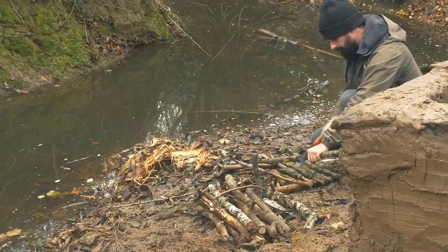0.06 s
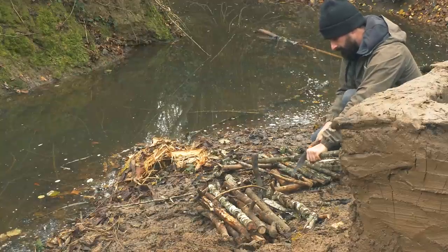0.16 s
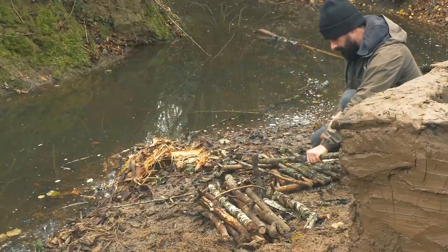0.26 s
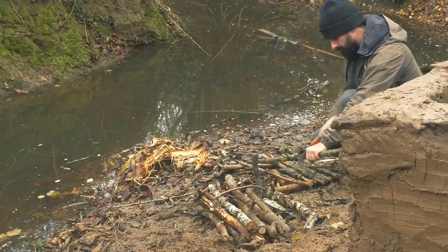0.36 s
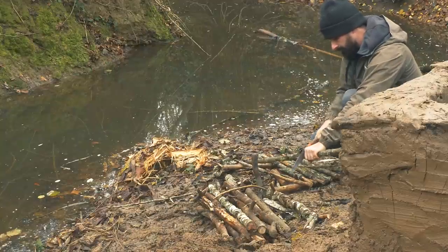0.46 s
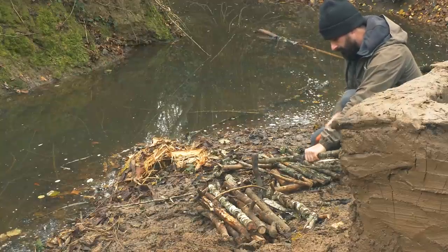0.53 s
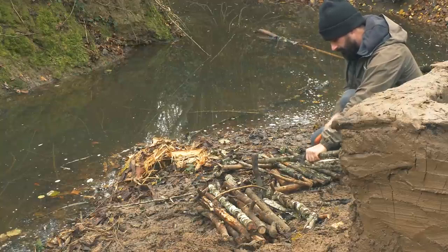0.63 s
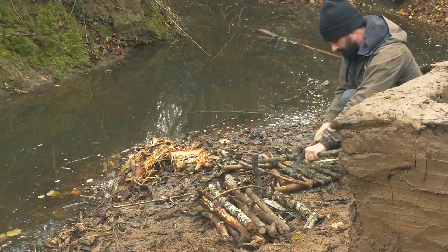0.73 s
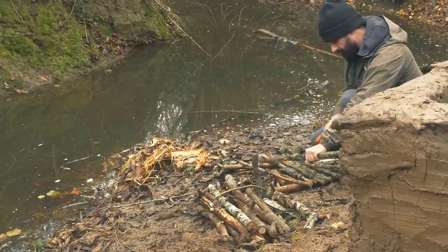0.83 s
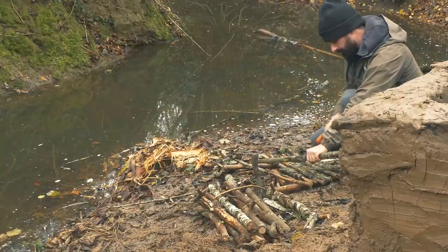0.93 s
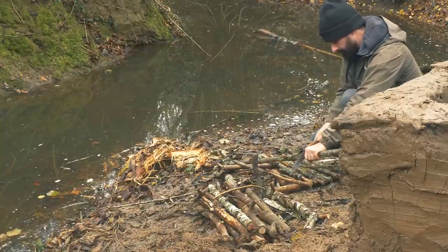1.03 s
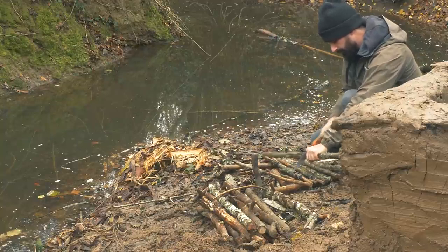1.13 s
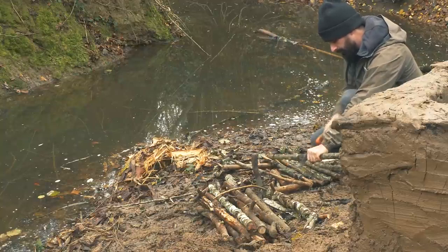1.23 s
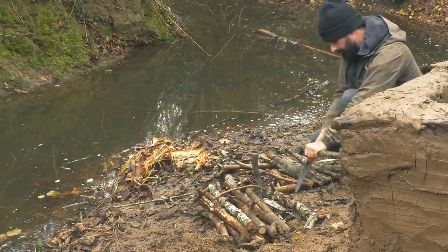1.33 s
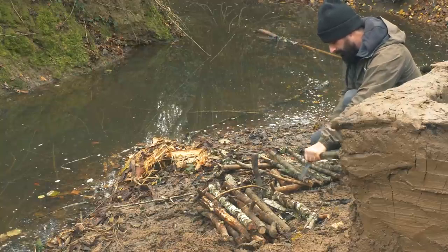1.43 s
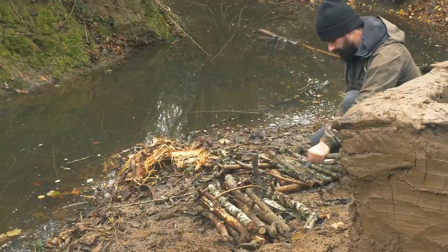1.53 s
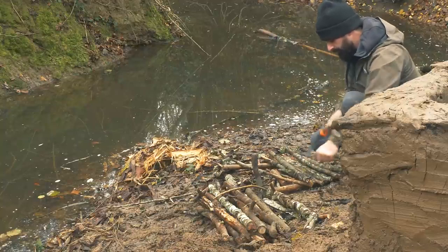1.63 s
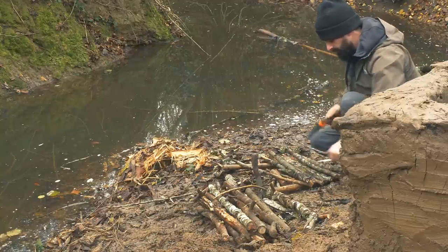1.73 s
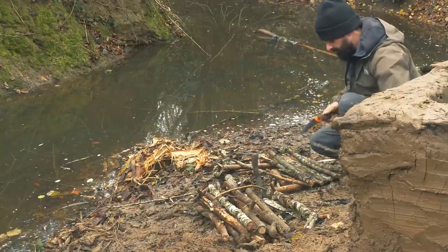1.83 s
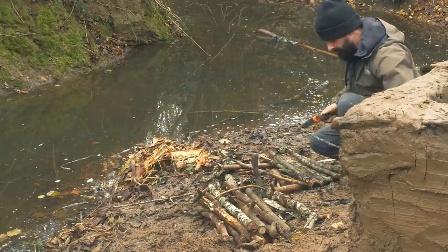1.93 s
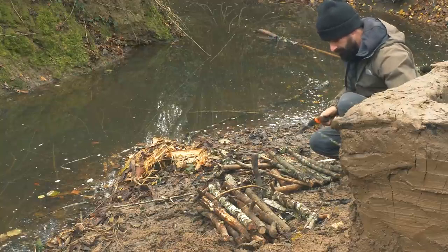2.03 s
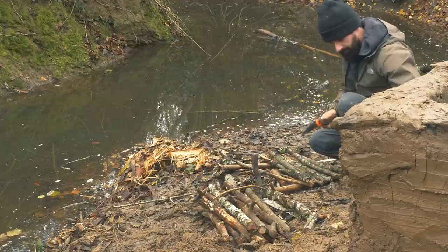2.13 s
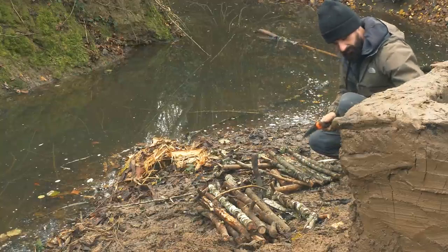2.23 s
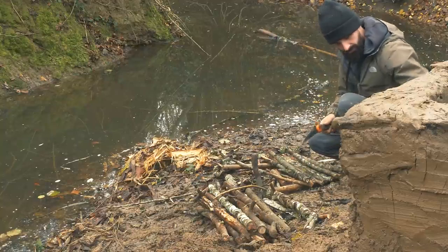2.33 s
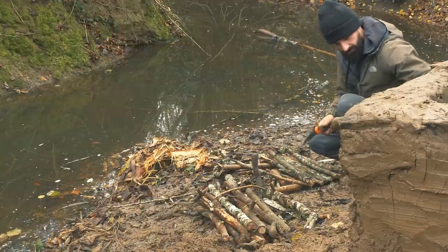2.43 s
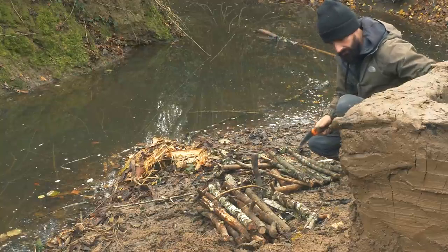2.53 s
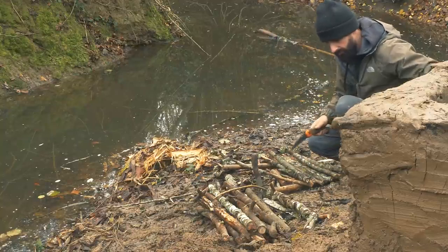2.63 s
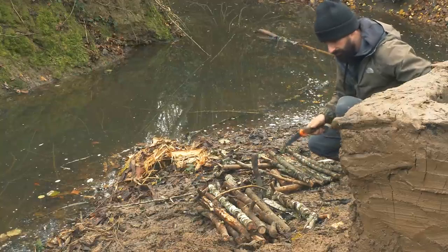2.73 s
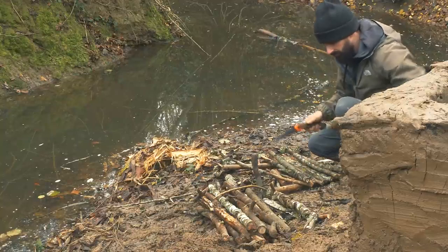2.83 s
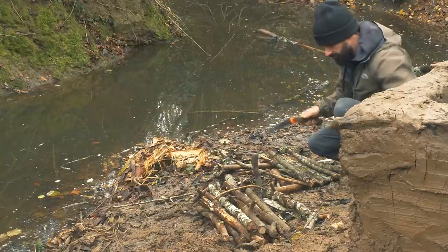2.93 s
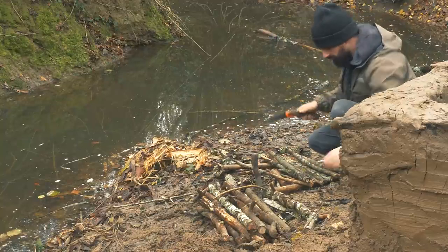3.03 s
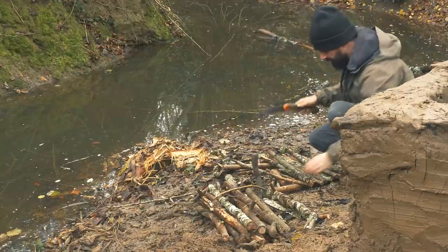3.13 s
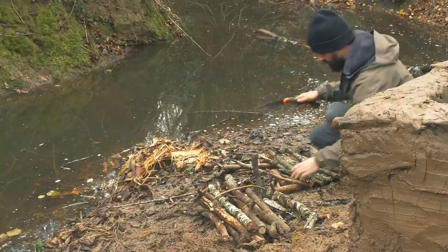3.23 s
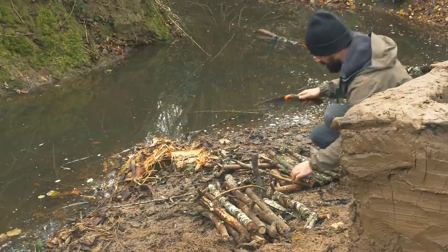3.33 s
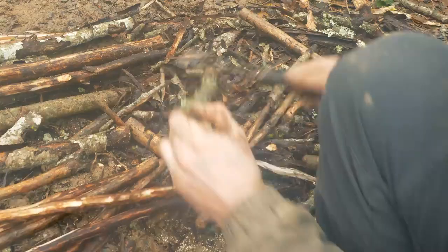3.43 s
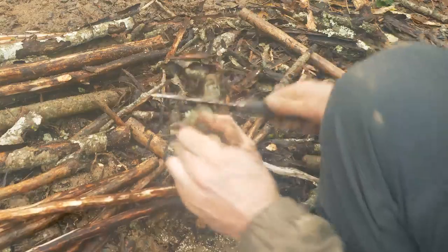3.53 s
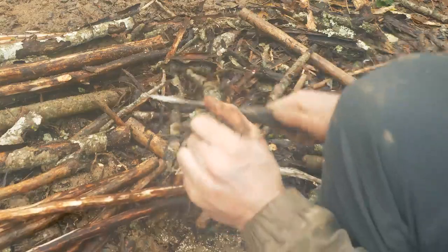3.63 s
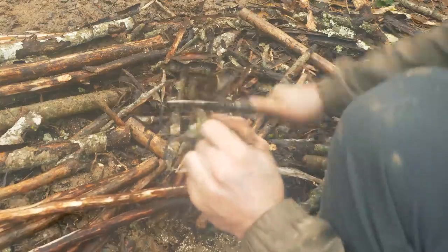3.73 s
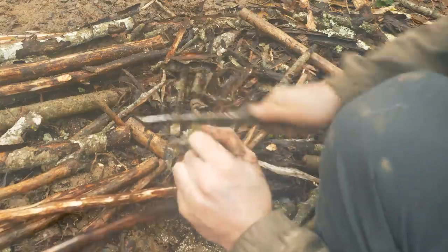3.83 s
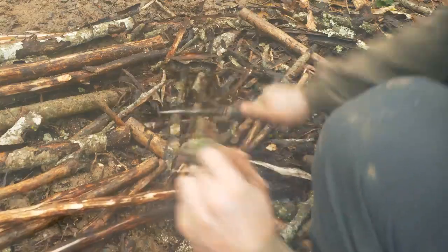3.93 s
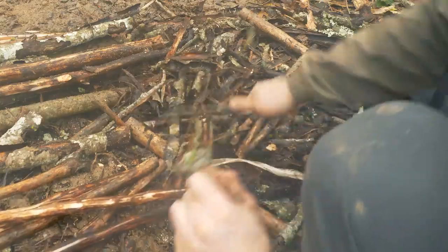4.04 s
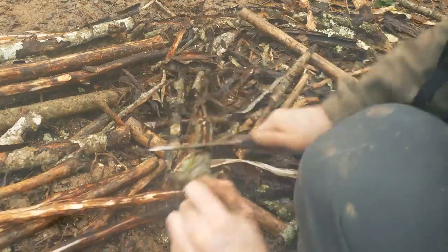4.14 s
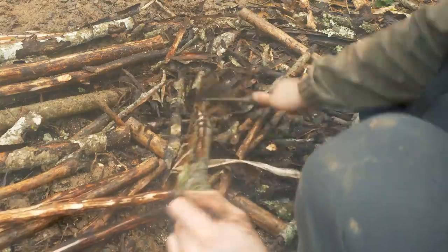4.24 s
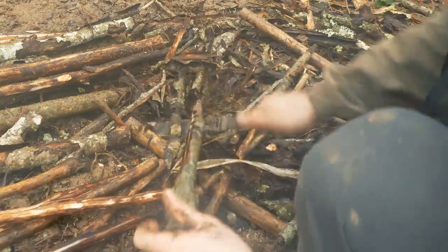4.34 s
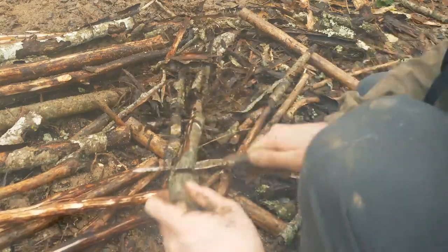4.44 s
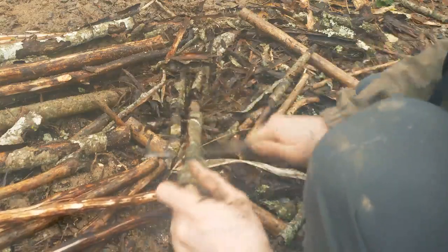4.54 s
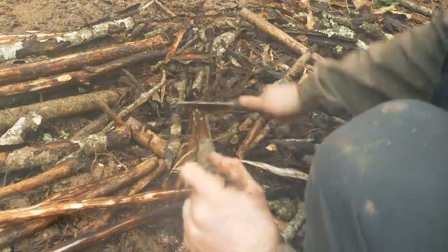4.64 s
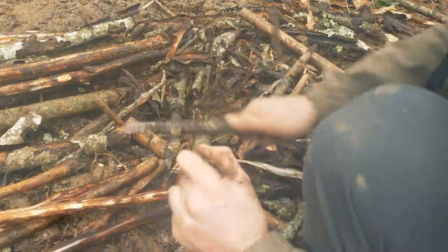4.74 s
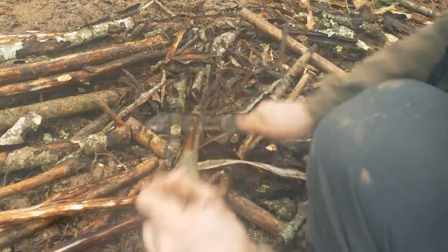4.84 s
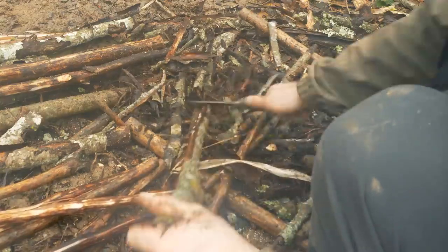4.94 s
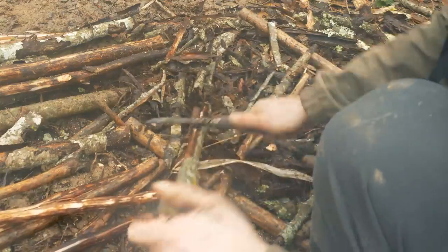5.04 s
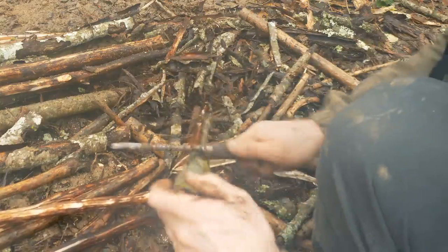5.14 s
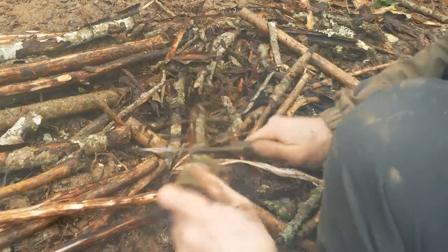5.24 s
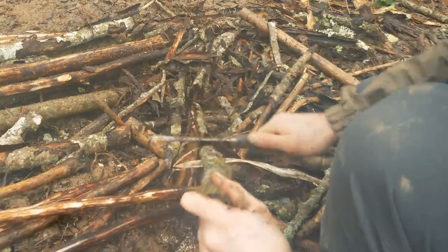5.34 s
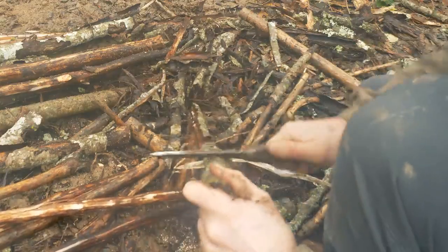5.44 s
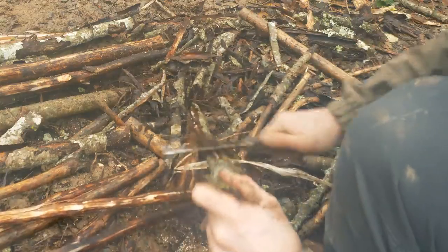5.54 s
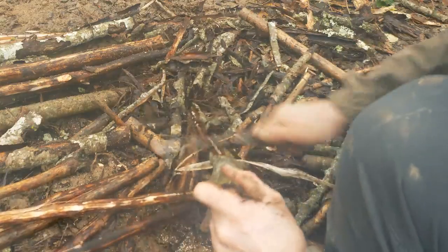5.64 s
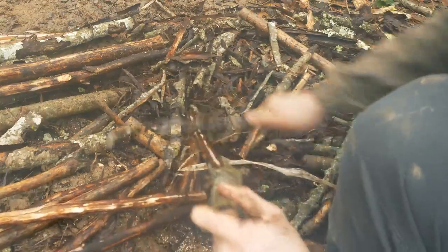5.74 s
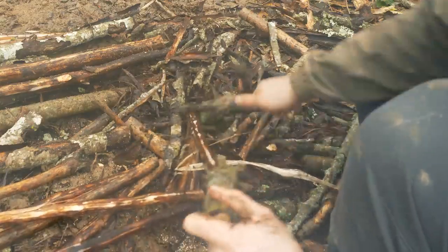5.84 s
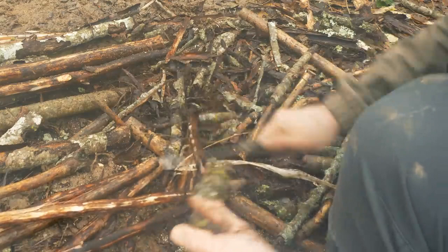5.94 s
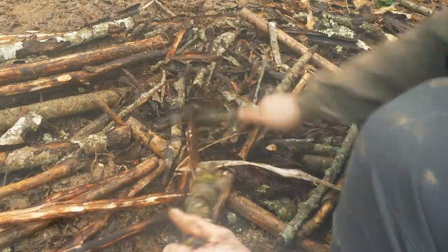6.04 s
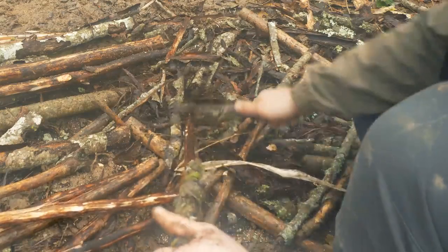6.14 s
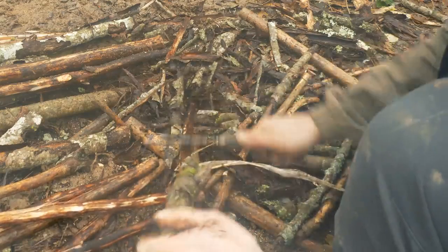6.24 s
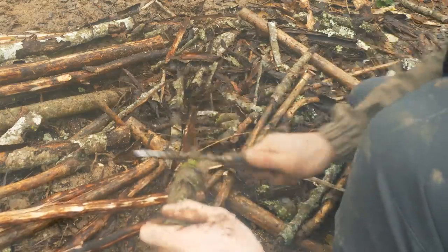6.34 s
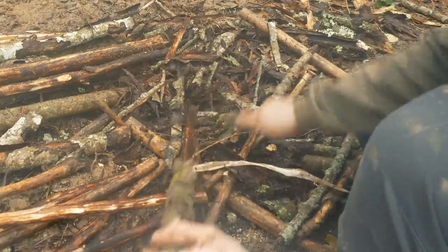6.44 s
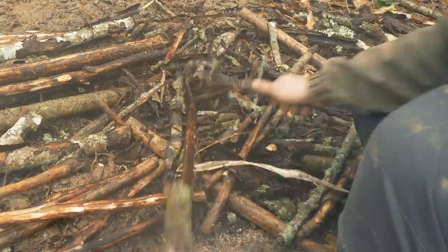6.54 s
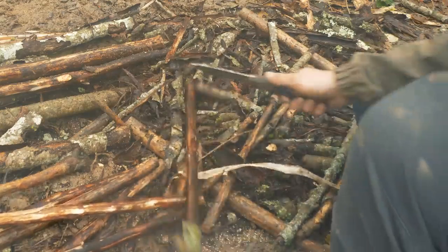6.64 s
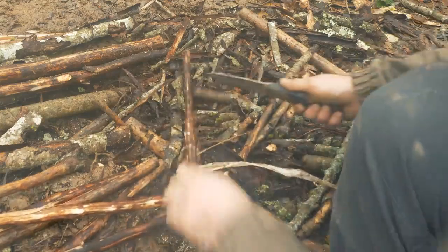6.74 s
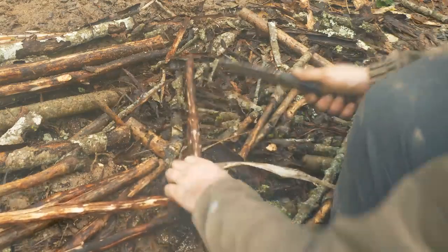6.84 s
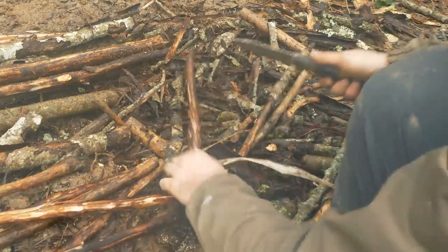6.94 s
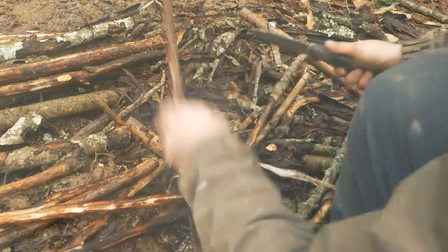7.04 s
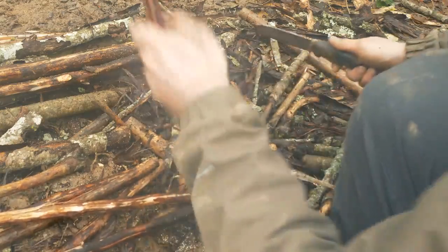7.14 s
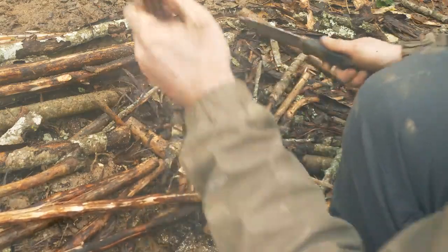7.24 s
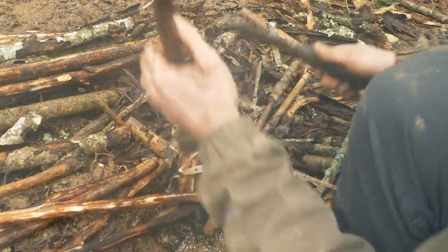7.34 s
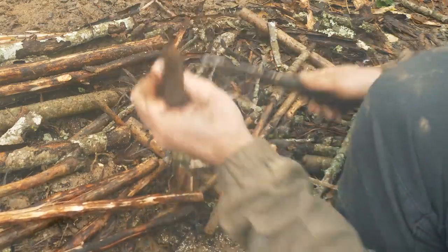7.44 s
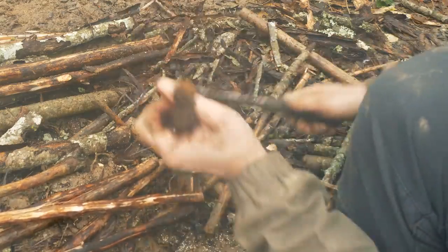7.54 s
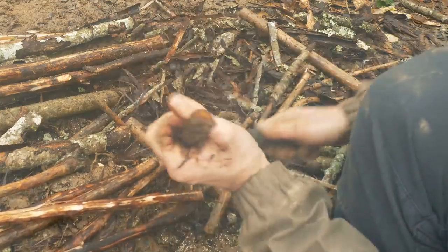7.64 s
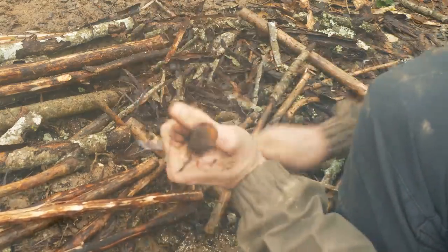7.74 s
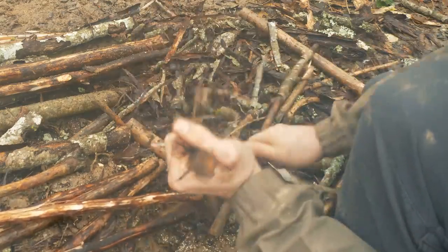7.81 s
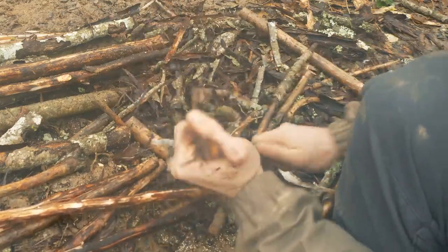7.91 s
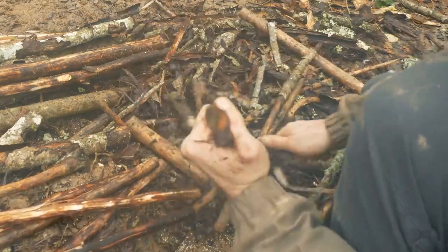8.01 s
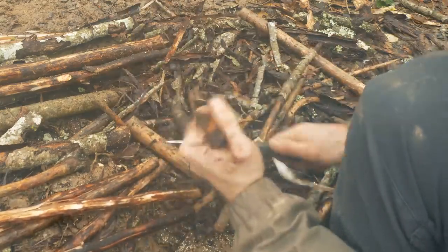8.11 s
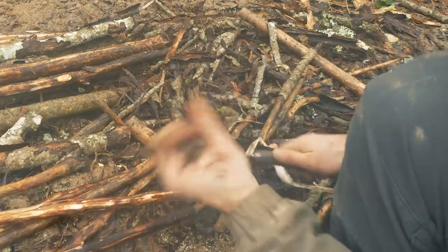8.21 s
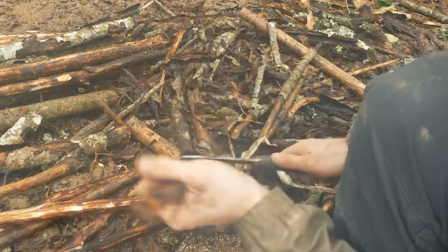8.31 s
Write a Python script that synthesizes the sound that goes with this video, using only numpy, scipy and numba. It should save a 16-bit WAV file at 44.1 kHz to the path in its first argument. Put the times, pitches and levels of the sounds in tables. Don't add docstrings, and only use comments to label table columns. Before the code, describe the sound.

Quiet, soft saw strokes and a thin high sizzle, broken by two startling fire pops and a cluster of twig snaps. Knees and sticks bump softly on wet ground. After an abrupt change, close bright scraping begins: short blade strokes tear fibrous bark, catching and snapping on knots, twigs rustling between. A lull of small wooden knocks leads to final crisp cuts. Near-mono outdoor sound, close and dry, with faint wind and water.

```python
import sys
import numpy as np
from scipy import signal
from scipy.fft import rfft, irfft, next_fast_len
from scipy.io import wavfile
from scipy.ndimage import uniform_filter1d
from numba import njit

SR = 44100
rng = np.random.default_rng(int(sys.argv[2]) if len(sys.argv) > 2 else 0)


def pcm_store(signal):
    levels = np.round(np.clip(np.atleast_2d(signal), -1, 1) * 32767)
    wavfile.write(sys.argv[1], SR, levels.astype(np.int16).T)


def boost(x):
    u = np.asarray(x, float) / 20
    return 10 ** u


N = 369116

# (time [s], length [s], level [dB], share of stroke at peak pressure [0-1], edge brightness [dB])
CUTS = [(3.789, 0.035, -27.5, 0.28, 2), (3.811, 0.042, -25, 0.6, 1), (4.006, 0.091, -24.5, 0.66, 0),
        (4.2, 0.065, -39, 0.43, 2.5), (4.285, 0.074, -25.5, 0.5, -1.5), (4.651, 0.088, -28.5, 0.6, 6),
        (4.912, 0.052, -32.5, 0.47, -3), (4.95, 0.062, -28.5, 0.39, 1), (5.205, 0.057, -39, 0.91, 4),
        (5.402, 0.034, -32.5, 0.58, 3.5), (5.607, 0.088, -34.5, 0.076, 6), (5.827, 0.087, -31.5, 0.27, 2.5),
        (6.111, 0.081, -31, 0.72, -2), (6.25, 0.057, -44, 0.5, 4.5), (6.509, 0.075, -31, 0.58, -4),
        (7.511, 0.019, -37, 0.86, 2), (7.857, 0.023, -28.5, 0.7, 4.5), (8.063, 0.0063, -20.5, 0.3, -5),
        (8.081, 0.011, -20.5, 0.52, -1.5)]
# (time [s], length [s], level [dB], hollow share [dB])
BRUSHES = [(2.872, 0.067, -51.5, 2.5), (3.203, 0.07, -53.5, -10), (3.315, 0.01, -46, -5),
           (3.557, 0.012, -47.5, -2), (3.777, 0.018, -37.5, -5), (3.923, 0.045, -40.5, -4.5),
           (4.133, 0.036, -43, -14), (4.402, 0.058, -46.5, -8.5), (4.483, 0.057, -47, -1.5),
           (4.812, 0.07, -42, -1.5), (5.092, 0.034, -45, -9), (5.157, 0.031, -44, -6),
           (5.333, 0.072, -46, -22), (5.497, 0.06, -45, -3.5), (5.586, 0.016, -41.5, -8),
           (5.814, 0.02, -41.5, -9), (5.747, 0.057, -44.5, -9.5), (5.964, 0.042, -42, -10.5),
           (6.022, 0.041, -42.5, -6), (6.32, 0.1, -47, -5.5), (6.585, 0.031, -42.5, -8),
           (6.871, 0.09, -48.5, -4), (7.536, 0.14, -57, 0), (7.878, 0.07, -44.5, -7),
           (8.042, 0.028, -38.5, -10), (8.1, 0.085, -41, -4.5), (8.329, 0.021, -42, -9)]
# (frequency [Hz], density [dB per Hz])
BARK_COLOUR = [(590, -60), (1000, -65), (1110, -4), (1540, 0.5), (2810, 2), (3120, 1.5), (7880, -2.5),
               (10200, 0.5), (16000, -12)]
# (time [s], peak [dB], ring [Hz])
CATCHES = [(3.789, -24, 3060), (3.851, -17, 1880), (4.012, -25, 3400), (4.052, -20, 4800),
           (4.086, -16, 4160), (4.147, -27.5, 2580), (4.285, -41, 2010), (4.312, -9.5, 2560),
           (4.32, -10.5, 4100), (4.663, -22, 11000), (4.684, -14, 3600), (4.717, -14.5, 2680),
           (4.732, -26, 3620), (4.917, -32, 1880), (4.959, -20, 3640), (4.972, -16, 3040),
           (4.982, -15, 3450), (5.595, -33, 4510), (5.616, -16.5, 3600), (5.869, -18.5, 5670),
           (5.878, -15.5, 3200), (6.143, -19.5, 835), (6.163, -19, 3900), (6.509, -28.5, 2520),
           (6.5743, -19.5, 2500), (6.5718, -19, 11100), (7.5207, -26, 10900), (7.5241, -26, 5400),
           (7.87, -15, 3550), (8.065, -13.5, 3320), (8.083, -11, 1230)]
# (time [s], peak [dB], ring [Hz])
SPLINTERS = [(2.8756, -27.5, 760), (3.0941, -28.5, 3450), (3.7892, -22, 3040.0), (3.7982, -23.0, 8720.0),
             (3.8047, -28, 7560), (3.8341, -23, 2240), (3.85, -22.5, 1790), (4.0281, -29, 470),
             (4.0306, -23, 3230), (4.0411, -19.0, 3250), (4.0516, -20, 4890.0), (4.0546, -28, 1420),
             (4.084, -24, 2440), (4.2975, -28, 470), (4.302, -25, 3040.0), (4.3185, -15.0, 9800),
             (4.327, -21, 4290.0), (4.3404, -19, 3420.0), (4.3429, -25, 5860), (4.3464, -20, 4290.0),
             (4.6901, -21, 5020), (4.6936, -26, 1490), (4.6996, -23, 7130), (4.7161, -38, 690),
             (4.7221, -26, 4780), (4.7246, -19, 5640.0), (4.7305, -19, 6090.0), (4.9251, -32, 1830),
             (4.9605, -28, 1940), (4.9825, -17.5, 6180.0), (4.9994, -28.0, 5000.0), (5.0917, -29, 2840),
             (5.42, -30, 3230), (5.5946, -33, 3420), (5.627, -27, 6720), (5.651, -28.0, 7190.0),
             (5.6589, -28.0, 7540.0), (5.847, -31, 4110), (5.871, -28, 1460), (5.8824, -29.0, 3850.0),
             (5.8894, -31, 9390), (5.8999, -31, 11130), (6.1383, -28, 2140), (6.1428, -23.5, 2200.0),
             (6.1623, -34, 2070), (6.1738, -33, 3960), (6.1803, -29, 7430), (6.3529, -30, 8360),
             (6.5414, -27, 2840.0), (6.5554, -33, 9520), (6.5589, -25, 2520), (7.9822, -31, 3770),
             (8.0625, -16, 10830), (8.0889, -23, 1290)]
# (time [s], length [s], level [dB])
SAWING = [(0.005, 0.089, -44.5), (0.167, 0.085, -49), (0.305, 0.12, -47), (0.464, 0.079, -48),
          (0.594, 0.095, -43), (0.749, 0.092, -46), (0.887, 0.11, -43), (1.064, 0.094, -49),
          (1.224, 0.1, -45.5), (1.3, 0.068, -51.5), (1.391, 0.022, -40)]
# (frequency [Hz], density [dB per Hz])
SAW_COLOUR = [(180, -19), (300, -0.5), (455, -3.5), (667, -2), (1720, -8), (3460, -2), (9700, -12.5),
              (10600, -29), (11600, -13), (16000, -17)]
# (time [s], peak [dB], ring [Hz], knock [dB], spit [dB])
POPS = [
    (.3399, 8.5, 987, -23.5, -23),
    (1.8492, 3.5, 8240, -27, -11.5),
]
# (time [s], peak [dB], ring [Hz], spit [dB])
SNAPS = [(0.151, -40, 713, -12), (0.459, -43, 1400, 3), (1.026, -35, 4080, -3), (1.192, -23.5, 2820, -11),
         (1.235, -33, 3100, -17), (1.275, -30, 3250, -12), (1.308, -19, 3260, -11), (1.353, -24, 2870, -11),
         (1.645, -35, 3900, -15), (3.0947, -28.5, 7950, -7), (3.229, -32.5, 2880, -22),
         (3.32, -35, 7000, -5), (3.5216, -24, 8400, -10), (5.094, -26, 2320, -27),
         (5.151, -22.5, 2450, -28), (5.36, -27, 1950, 2), (5.42, -23, 4170, 9), (5.677, -33, 7520, 12),
         (6.24, -32.5, 729, -5), (6.267, -35, 2270, -7), (6.353, -25, 8360, 3.5), (6.433, -31, 6940, 1),
         (7.348, -36.5, 4500, 0.5), (7.77, -34, 7160, -3), (7.808, -37.5, 829, 2), (7.853, -33, 7800, -4),
         (7.983, -29.5, 3730, -26), (8.123, -23.5, 1610, -22), (8.161, -20.5, 1260, -25),
         (8.329, -32, 2130, 3.5)]
# (time [s], peak [dB], ring [Hz], knock [dB])
KNOCKS = [(0.78, -34, 453, -9), (0.808, -39, 447, 1), (1.496, -34, 585, -10), (1.549, -35.5, 1010, -11),
          (1.6257, -28.5, 537, -12), (2.161, -32, 2790, -14), (2.475, -48, 476, 4), (2.531, -45, 452, 1),
          (2.863, -40, 1300, -8), (2.8765, -26, 430, -8), (2.888, -25, 720, -20), (3.368, -38, 2270, -15),
          (3.409, -36, 493, -15), (3.436, -36, 455, -19), (3.562, -34.5, 770, -15),
          (4.039, -19.5, 3220, -7), (6.004, -28, 900, -27), (6.548, -17, 850, -35),
          (6.7278, -22, 1720, -53), (6.847, -30.5, 1200, -34), (6.91, -30, 1320, -22),
          (6.942, -33.5, 1960, -22), (6.97, -30.5, 705, -28), (7.075, -41, 1730, -16),
          (7.151, -34.5, 1730, -11.5), (7.197, -38.5, 750, -13), (7.273, -42, 1870, -7),
          (7.294, -39, 1060, -10), (7.324, -35.5, 1720, -20)]
# (multiple of ring [ratio], level [dB])
TWIG_MODES = [(1.002, -0.5), (1.96, -8.5), (2.8, -19.5), (3.4, -15.5)]
# (time [s], peak [dB], ring [Hz])
CRACKS = [(0.3412, -12, 1900), (0.3405, -9, 3260), (1.8495, -15, 613), (1.1915, -34, 3600),
          (1.549, -37, 1300), (2.1609, -28, 1900), (2.1612, -31.5, 620), (1.8494, -15, 4900),
          (2.8874, -30, 3300), (3.0941, -23, 950), (3.0951, -24, 1700), (3.5213, -6.5, 6500),
          (3.5213, -23, 2400), (6.848, -36, 1700), (7.15, -34, 1500), (7.275, -38, 1600),
          (7.312, -42, 2600), (7.5083, -31, 1900), (7.5237, -12.5, 4600)]
# (time [s], peak [dB], ring [Hz])
TICKS = [(0.9476, -34.5, 3620.0), (1.1866, -40.0, 2930), (1.2564, -36, 3450.0), (1.6246, -32, 8140),
         (1.6615, -42, 3570.0), (1.8346, -46, 1230.0), (2.5141, -44, 820.0), (3.7463, -40, 2220.0),
         (3.9538, -37, 2240), (3.9738, -40, 1980.0), (4.1833, -40.0, 880.0), (4.1898, -40.0, 3900.0),
         (4.2402, -29, 3920.0), (4.2836, -31, 430), (4.4422, -40.0, 6500.0), (4.5554, -44.0, 600.0),
         (4.5689, -47.0, 1380.0), (4.5939, -41, 10830.0), (4.6248, -39, 2520.0), (4.6288, -43, 3290.0),
         (4.7026, -33, 990), (4.8164, -34, 860.0), (4.8268, -35, 2170.0), (4.8553, -31, 600.0),
         (4.8727, -30, 2630.0), (5.0723, -39, 4070.0), (5.1062, -36, 2990), (5.1556, -29, 2330.0),
         (5.179, -35, 3000), (5.2424, -34.0, 10920.0), (5.2798, -42, 1340.0), (5.3451, -39.0, 3170.0),
         (5.3841, -34.0, 10010.0), (5.5417, -40, 1440.0), (5.5467, -44, 1740), (5.6854, -35, 4410.0),
         (5.84, -36, 470), (5.9932, -33, 3250), (6.1837, -37, 1100), (6.1882, -40, 690),
         (6.2666, -32, 10900), (6.2695, -35, 4480.0), (6.2765, -38, 2280), (6.3129, -40.0, 3210.0),
         (6.499, -35, 10980.0), (6.5085, -36, 560), (6.528, -29, 2150.0), (6.7839, -45.0, 4030.0),
         (6.8388, -44, 1100.0), (6.9824, -42.0, 930.0), (7.3132, -49, 600.0), (7.8924, -37.0, 5920.0),
         (8.0395, -38, 1920.0), (8.0495, -28, 10230.0), (8.1034, -32, 950.0), (8.1408, -34.0, 1460.0),
         (8.1468, -30, 1400.0), (8.1707, -32, 5750.0), (8.1747, -34.0, 1360.0), (8.1967, -36.0, 4500.0)]
# (time [s], peak [dB], ring [Hz])
THUDS = [(3.349, -50, 45.8), (3.457, -46, 45.8), (4.065, -46, 95), (4.317, -44.5, 117.7),
         (4.702, -46.5, 80), (5.008, -43.5, 110), (5.399, -45, 49), (5.882, -48, 107), (6.734, -44.5, 82.5),
         (6.8, -50, 86), (6.899, -47.5, 82), (7.534, -51, 75.5), (7.881, -45, 68), (8.078, -43.5, 67.6),
         (8.111, -47.5, 126), (4.358, -46, 104)]
# (time [s], peak [dB], centre [Hz])
SHIFTS = [(1.412, -44.5, 211), (1.624, -31.5, 276), (1.845, -38.5, 297), (2.025, -44, 199),
          (2.159, -44, 280), (2.357, -47, 200), (2.473, -42, 283), (2.532, -42.5, 283), (2.642, -41.5, 214),
          (2.713, -45.5, 213), (2.874, -39, 285), (3.347, -42.5, 275), (3.41, -51, 229), (3.47, -44, 240),
          (5.414, -40, 268), (8.083, -34.5, 159), (8.299, -48, 280)]
# (frequency [Hz], density [dB per Hz])
SIZZLE_COLOUR = [(1500, -52), (2700, -4), (3100, -7.5), (5100, -26), (6100, -1), (7000, 3), (7600, -1),
                 (8600, 3), (9800, -12), (10500, -40), (11300, -9.5), (12800, -2.5), (15500, -14.5),
                 (17000, -22)]
# (time [s], level [dB])
BUSY = [(0.0, -54.5), (1.0, -59), (1.42, -54), (1.63, -55.5), (2.31, -59), (2.82, -58.5), (3.66, -52.5),
        (3.96, -48.5), (4.22, -52), (4.48, -54), (5.78, -50.5), (6.6, -53), (7.18, -55), (7.32, -59.5),
        (7.74, -59), (7.97, -48.5), (8.16, -57), (8.37, -52)]
# (frequency [Hz], density [dB per Hz])
RUSTLE_COLOUR = [(150, -48), (300, -1.5), (700, -2.5), (1500, -5.5), (3000, -8.5), (6000, -9.5),
                 (11000, -11), (16000, -18.5), (18000, -50)]
# (time [s], level [dB])
WIND = [(0.0, -46), (0.14, -43), (0.91, -39), (1.09, -51), (1.28, -43), (1.56, -55), (1.7, -46),
        (2.38, -54), (2.8, -51), (3.26, -49.5), (4.1, -56), (4.8, -62), (5.43, -59), (6.41, -63),
        (6.88, -56.5), (7.7, -67), (8.16, -51.5), (8.37, -67)]
# (frequency [Hz], density [dB per Hz])
WIND_COLOUR = [(4, -26.5), (12, 6.5), (35, -11.5), (50, -15.0), (90, -53), (400, -67.0)]
# (time [s], level [dB])
STREAM = [(0, -57), (1.3, -63), (2.4, -61), (3.0, -56.5), (3.2, -62), (3.9, -61), (4.2, -69), (8.37, -67.5)]
# (low edge [Hz], high edge [Hz], level [dB])
GURGLE = [(151, 182.5, -5.5), (197.6, 238, -4.5), (256, 299, -2.5)]
# (frequency [Hz], level under the sound [dB])
RESIDUE = [(30, -38), (80, -28), (200, -19), (380, -21), (700, -21.5), (1290, -21), (2380, -19.5),
           (4400, -17), (8120, -16.5), (15000, -10.5)]

CUT_BITE_DB, CUT_LIFT_DB, CUT_HOLLOW_DB = -8.5, -7, -8.5
CUT_RISE_SHARE, CUT_FALL_SHARE = 0.42, 0.72
BRUSH_BITE_DB, BRUSH_PEAK_SHARE, BRUSH_LIFT_DB = -2.5, 0.47, -2
SAW_BITE_DB, SAW_PEAK_SHARE, SAW_LIFT_DB = -6, 0.66, -6.5
CATCH_KNOCK_DB, CATCH_SPIT_DB = -23.5, -6
SNAP_KNOCK_DB, KNOCK_PER_DB = -25, 0.11
SIZZLE_DB, SIZZLE_FADE_DB_PER_S, DRIFT_DB = -57, -0.8, 1.2
SWELL_DB = 1.8
CUT_S = 3.58
TOP_HZ = 15750
CLIP = 0.5


def unit(x):
    return x / np.sqrt(np.mean(x ** 2))


def top(x):
    return x / np.abs(x).max()


def curve(table, column):
    table = np.array(table, float)
    return np.interp(np.arange(N) / SR, table[:, 0], table[:, column], left=-120, right=-120)


def colour(x, points):
    hz, db = np.transpose(points)
    size = next_fast_len(x.shape[-1])
    f_hz = np.maximum(np.arange(size // 2 + 1) * SR / size, 1)
    gain = boost(np.interp(np.log(f_hz), np.log(hz), db))
    return irfft(rfft(x, size) * gain, size)[..., :x.shape[-1]]


def band(x, lo_hz, hi_hz, order=2):
    return signal.sosfilt(signal.butter(order, [lo_hz, hi_hz], "bandpass", fs=SR, output="sos"), x)


def walk(rate_hz):
    hold = max(int(SR / rate_hz), 1)
    steps = np.repeat(rng.standard_normal(N // hold + 1), hold)
    return 1.35 * uniform_filter1d(steps, hold)[:N]


@njit
def ring(start, hz, decay, size, length):
    out = np.zeros(length)
    for k in range(len(start)):
        turn = decay[k] * np.exp(2j * np.pi * hz[k] / SR)
        z, gain, i = size[k] + 0j, 1., start[k]
        while gain > .01 and i < length:
            out[i] += z.imag
            z, gain, i = z * turn, gain * decay[k], i + 1
    return out


def grains(count, spread_db, ring_ms, top_hz=16000):
    when, pitch, size, long = rng.random((count, 4)).T
    decay = np.exp(-1000 / (SR * ring_ms * (0.38 + 1.0 * long)))
    size_db = spread_db * np.minimum(-np.log(1 - size), 5.5)
    start = (when * N).astype(np.int64)
    return unit(ring(start, 200 + top_hz * pitch, decay, boost(size_db), N))


def friction(spread_db, ring_ms, slip_db, slip_hz, hiss_db, count):
    rub = grains(count, spread_db, ring_ms) + boost(hiss_db) * rng.standard_normal(N)
    return rub * boost(slip_db * walk(slip_hz) + 1.22 * walk(45))


def pressure(strokes, bite_db, lift_db, rise_s, fall_s):
    levels = []
    for s, long, db, share in strokes:
        peak_s = s + long * min(max(share, .05), .95)
        end_s = s + long
        shape = [(s - rise_s, db + bite_db - 23), (s, db + bite_db), (peak_s, db),
                 (end_s, db + lift_db), (end_s + fall_s, db + lift_db - 21.0)]
        levels.append(curve(shape, 1))
    return np.max(levels, axis=0)


def hand(rise_s, fall_s, hollow):
    strokes = [row[:4] for row in CUTS]
    cuts = pressure(strokes, CUT_BITE_DB, CUT_LIFT_DB, CUT_RISE_SHARE * rise_s, CUT_FALL_SHARE * fall_s)
    cuts = cuts + hollow * CUT_HOLLOW_DB
    brushes = [(s, long, db + hollow * h, BRUSH_PEAK_SHARE) for s, long, db, h in BRUSHES]
    return np.maximum(cuts, pressure(brushes, BRUSH_BITE_DB, BRUSH_LIFT_DB, rise_s, fall_s))


def blade():
    rub = unit(friction(spread_db=2.5, ring_ms=0.67, slip_db=2.5, slip_hz=300, hiss_db=-4.5, count=40000))
    chips = grains(count=3500, spread_db=2.5, ring_ms=3.8, top_hz=5504)
    rub = rub + boost(-9.0) * chips
    bright = unit(colour(rub, BARK_COLOUR))
    hollow = unit(band(rub, 246, 1280))
    bark_db = hand(rise_s=0.017, fall_s=0.021, hollow=False)
    stick_db = hand(rise_s=0.011, fall_s=0.014, hollow=True)
    middle_s = [c[0] + c[1] / 2 for c in CUTS]
    edge_db = np.interp(np.arange(N) / SR, middle_s, [c[4] for c in CUTS])
    sheen = boost(0.38 * np.clip(bark_db + 30, -30, 5) + edge_db) - 1
    bark = bright + sheen * band(bright, 4100, 22000, order=1)
    return boost(bark_db) * bark + boost(stick_db - 2.0) * hollow


def saw():
    rub = friction(spread_db=3.5, ring_ms=0.2, slip_db=-0.5, slip_hz=310, hiss_db=6.5, count=40000)
    strokes = [row + (SAW_PEAK_SHARE,) for row in SAWING]
    level_db = pressure(strokes, SAW_BITE_DB, SAW_LIFT_DB, rise_s=0.041, fall_s=0.05)
    return unit(colour(rub, SAW_COLOUR)) * boost(level_db)


def hits(table, t60_s, low_share, tick, crack_db, crack_hz, scatter_db, knock_hz, linger, upper_db=0):
    out, t = np.zeros(N + 4096), np.arange(4096) / SR
    noise = rng.standard_normal((len(table), 3, len(t)))
    fall = np.log(1000) * t / t60_s
    for (s, db, hz, knock_db, spit_db), chance in zip(table, noise):
        burst = (chance[0] - tick * (t == 0)) * np.exp(-1.3 * fall)
        low_hz = min(max(low_share * hz, 500), 1800)
        crack = top(band(burst, low_hz, crack_hz, order=3))
        twig = np.zeros(len(t))
        for k, mode_db in TWIG_MODES:
            if k * hz < 2.2 * crack_hz:
                die = np.exp(-1.6 * fall * (k * hz / 1500) ** 0.044)
                twig += boost(mode_db + upper_db * (k > 1.5)) * np.sin(2 * np.pi * k * hz * t) * die
        knock = top(band(chance[1] * np.exp(-linger * fall), knock_hz, 2.95 * knock_hz, order=3))
        spit = top(band(chance[1] * np.exp(-2.5 * fall), 6500, 12800))
        scatter = top(band(chance[2], 400, 1.26 * crack_hz))
        scatter = scatter * np.exp(-.25 * fall) * np.minimum(t / 0.00069, 1)
        sound = boost(crack_db) * crack - 0.64 * twig + boost(knock_db) * knock
        sound = sound + boost(spit_db) * spit + boost(scatter_db) * scatter
        i = int((s + .0007) * SR)
        out[i:i + len(t)] += boost(db) * sound
    return out[:N]


def snaps():
    breaks = [(s, db, hz, SNAP_KNOCK_DB + KNOCK_PER_DB * (db + 23), spit_db) for s, db, hz, spit_db in SNAPS]
    breaks += [(s, db, hz, CATCH_KNOCK_DB + KNOCK_PER_DB * (db + 27.5), CATCH_SPIT_DB)
               for s, db, hz in CATCHES]
    return hits(breaks, t60_s=0.015, low_share=0.44, tick=2.1, crack_db=-5.0, crack_hz=7000,
                scatter_db=-18.0, knock_hz=276, linger=0.88)


def knocks():
    return hits([row + (-40,) for row in KNOCKS], t60_s=0.02, low_share=0.37, tick=2.9, crack_db=-7.0,
                crack_hz=2600, scatter_db=-14.5, knock_hz=200, linger=0.55, upper_db=-12)


def pops():
    return hits(POPS, t60_s=0.009, low_share=0.11, tick=3.05, crack_db=-11.5, crack_hz=7000,
                scatter_db=-19.5, knock_hz=283, linger=0.48)


def ticks(table, cycles, longest_ms, click_db, click_ms, gain_db, rise_ms=0.3):
    out, t = np.zeros(N + 1024), np.arange(1024) / SR
    for (s, db, hz), chance in zip(table, rng.standard_normal((len(table), len(t)))):
        tone = np.sin(2 * np.pi * hz * t) * np.exp(-t / min(cycles / hz, longest_ms / 1000))
        click = band(chance, 0.54 * hz, min(1.67 * hz, 15000), order=1) * np.exp(-1000 * t / click_ms)
        rise = np.minimum(1000 * t / rise_ms, 1)
        i = int((s + .0005) * SR)
        out[i:i + len(t)] += boost(db + gain_db) * rise * (tone + boost(click_db) * top(click))
    return out[:N]


def fibres():
    splinters = ticks(SPLINTERS, cycles=4.8, longest_ms=2.0, click_db=-5.5, click_ms=1.05, gain_db=2.5)
    crumbs = ticks(TICKS, cycles=5.0, longest_ms=1.6, click_db=-1.5, click_ms=2.0, gain_db=2.1)
    cracks = ticks(CRACKS, cycles=1.0, longest_ms=1.3, click_db=-12.5, click_ms=2.3, gain_db=2.5,
                   rise_ms=0.063)
    return splinters + crumbs - band(cracks, 240, 18000, order=1)


def thuds():
    out, t = np.zeros(N + 8192), np.arange(8192) / SR
    swell = t / 0.015 * np.exp(1 - t / 0.02)
    for s, db, hz in THUDS:
        i = int(s * SR)
        out[i:i + len(t)] += boost(db - 3) * swell * np.sin(2 * np.pi * hz * t * (1.05 - 2.6 * t))
    return out[:N] * boost(1.5 * walk(70))


def shifts():
    out, t = np.zeros(N + 4096), np.arange(4096) / SR
    for (s, db, hz), chance in zip(SHIFTS, rng.standard_normal((len(SHIFTS), len(t)))):
        bump = band(chance, 0.735 * hz, 1.27 * hz) * t * np.exp(-t / 0.0067)
        i = int(s * SR)
        out[i:i + len(t)] += boost(db - 1.5) * top(bump)
    return out[:N]


def fire():
    t = np.arange(N) / SR
    hiss = colour(rng.standard_normal(N), SIZZLE_COLOUR)
    edges_hz = 1500 * 2 ** np.arange(0, 3.7, .2)
    sizzle = np.zeros(N)
    for lo_hz, hi_hz in zip(edges_hz, edges_hz[1:]):
        drift_db = DRIFT_DB * walk(9.2) + 1.1 * walk(24.92)
        sizzle += boost(drift_db) * band(hiss, lo_hz, hi_hz)
    near = np.clip((CUT_S - t) / 0.19, .05, 1)
    return unit(sizzle) * near * boost(SIZZLE_DB + SIZZLE_FADE_DB_PER_S * t)


def rustle():
    bits = friction(spread_db=2.5, ring_ms=0.91, slip_db=-0.74, slip_hz=16, hiss_db=5.0, count=9000)
    return unit(colour(bits, RUSTLE_COLOUR)) * boost(curve(BUSY, 1) - 1.5)


def air():
    wind = unit(colour(rng.standard_normal(N), WIND_COLOUR))
    wind = wind + boost(-7.5) * unit(band(rng.standard_normal(N), 29.2, 36.1))
    rumble = boost(-61.0 + 1.9 * walk(6.2)) * unit(band(rng.standard_normal(N), 23.1, 113))
    gurgle = np.zeros(N)
    for lo_hz, hi_hz, db in GURGLE:
        gurgle += boost(db + 2.1 * walk(11)) * unit(band(rng.standard_normal(N), lo_hz, hi_hz))
    gusts = boost(curve(WIND, 1) + 0.62 * walk(6))
    stream = boost(curve(STREAM, 1) + SWELL_DB * walk(12))
    return wind * gusts + rumble + gurgle * stream


def scene():
    steady = saw() + blade() + fire() + rustle() + air() + thuds()
    breaks = band(snaps() + knocks(), 300, 13000) + band(pops(), 335, 14800)
    low_pass = signal.ellip(8, .2, 60, TOP_HZ, fs=SR, output="sos")
    mono = signal.sosfilt(low_pass, steady + fibres()) + breaks + shifts()
    return np.array([mono, mono])


def band_limit(x):
    return signal.sosfilt(signal.butter(12, 16970, fs=SR, output="sos"), x)


def record(dry):
    excess = dry[0] - np.clip(dry[0], -CLIP, CLIP)
    loud = dry[0] - band(excess, 140, 21000, order=1)
    loud = colour(loud, [(16650, 0), (16980, -50)])
    cells = signal.stft(colour(loud, RESIDUE), nperseg=512)[2]
    cells = cells * np.exp(2j * np.pi * rng.random(cells.shape))
    residue = signal.istft(cells, nperseg=512)[1][:N]
    residue = boost(-3.5) * band(residue, 20, 18000, order=1)
    mix = loud + np.array([residue, -residue])
    return band_limit(mix)


dry = scene()
out = record(dry)
pcm_store(out)
```